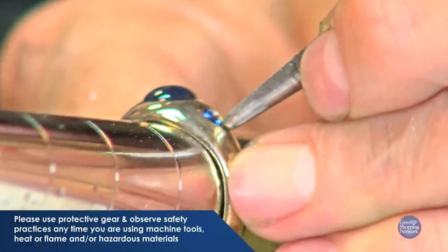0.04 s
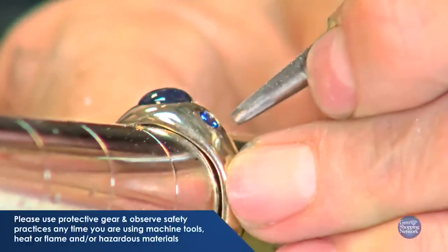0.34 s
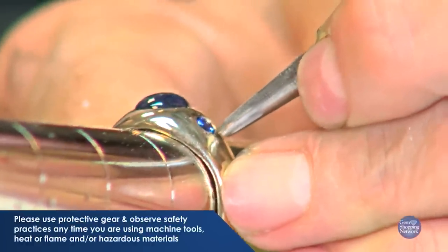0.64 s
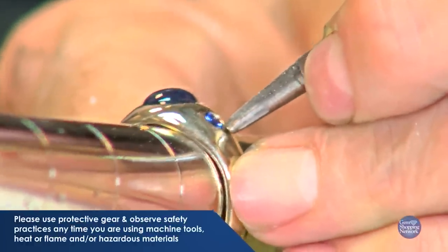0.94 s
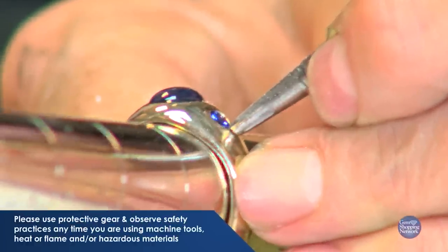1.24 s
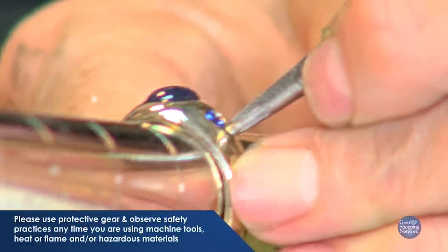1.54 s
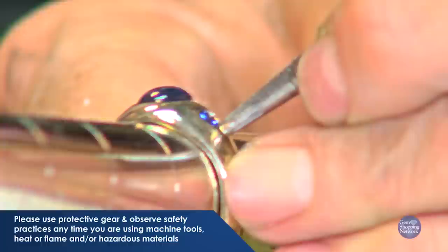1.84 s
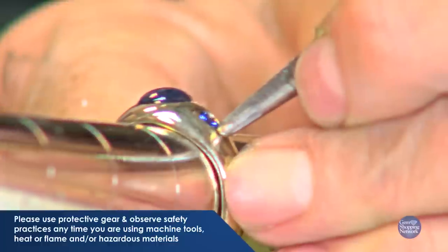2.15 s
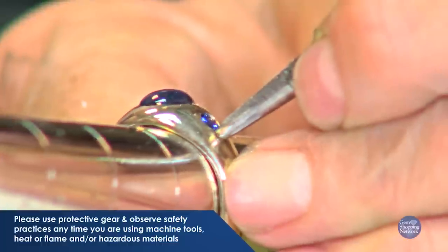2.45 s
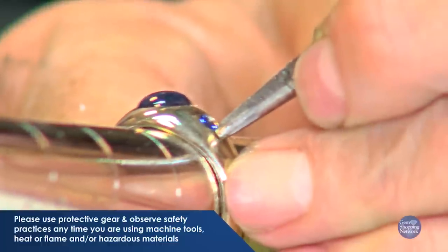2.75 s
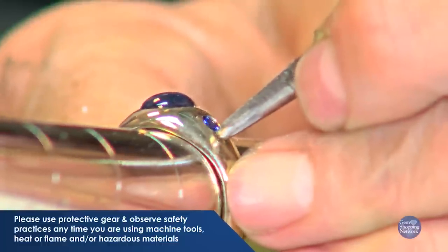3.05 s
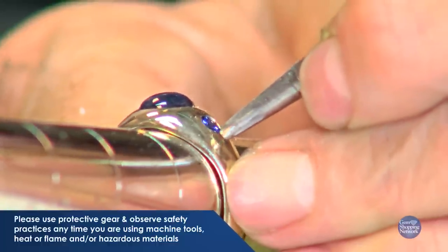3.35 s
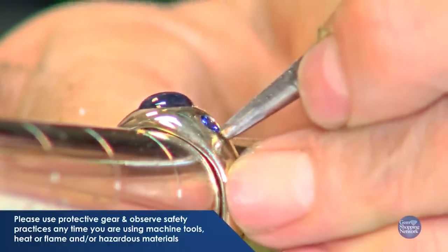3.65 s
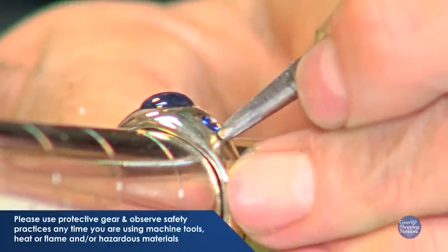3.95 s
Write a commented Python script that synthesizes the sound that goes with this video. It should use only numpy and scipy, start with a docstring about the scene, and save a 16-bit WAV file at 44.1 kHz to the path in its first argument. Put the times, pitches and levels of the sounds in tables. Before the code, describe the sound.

A powered jeweler's hammer tool rapidly strikes a metal ring, with two brief pauses.

```python
"""A motor-driven hammer tool beats a ring on a steel rod, about 28 strokes a second, in a small workshop.
From the start each blow chatters for 3 ms, makes tip and ring sound, and thumps the bench; the tool
rattles in between. At 0.3 s it is lifted and only ticks over a soft hiss. From 0.6 s it hammers again,
its tone following how the tip sits: loose, firm or glancing. It is lifted once more at 3.2 s,
then brushes the ring at 3.5 s and hammers on to the end."""
import sys
import numpy as np
from scipy import signal
from scipy.fft import rfft, irfft
from scipy.io import wavfile

SR = 44100
rng = np.random.default_rng(int(sys.argv[2]) if len(sys.argv) > 2 else 0)


def to_wav(sig):
    """Store sig (one row per channel, or 1-D mono) as 16-bit WAV at the path in sys.argv[1].

    Samples outside -1..1 are clipped; the rate is SR.
    """
    pcm = np.clip(np.atleast_2d(sig), -1, 1) * 32767
    pcm = np.round(pcm).astype(np.int16)
    wavfile.write(sys.argv[1], SR, pcm.T)  # frames by channels


N = 176400
SIZE = 4096  # samples set aside for one short sound
HZ = np.arange(SIZE // 2 + 1) * SR / SIZE  # its frequencies
T = np.arange(SIZE) / SR  # its time in seconds
BLOW_DB = -1.5  # added to both the blows and the rattle

# how hard the tip strikes (time [s], level [dB])
BLOW_STRENGTH = [(0.01, 1.7), (0.19, 0.7), (0.23, 3), (0.77, 1.5), (0.91, 0.1), (0.99, 2), (1.02, 1.4),
                 (1.64, 0.9), (1.71, 0.5), (1.97, 1.9), (2.18, 1.3), (2.44, 1), (2.51, -0.5), (2.93, 1),
                 (3.01, 0), (3.04, 2.7), (3.08, -1.5), (3.11, -0.3), (3.15, -6.5), (3.18, 1.8), (3.61, 2.5),
                 (3.82, 0), (3.85, 0.5), (4.0, 0.5)]


def amp(db):
    """Turn decibels into a factor to multiply by."""
    return 10 ** (np.asarray(db) / 20)


def curve(t, rows, column=1):
    """Read a table at time t, sliding in a straight line from row to row."""
    rows = np.array(rows, float)
    return np.interp(t, rows[:, 0], rows[:, column])


def colour(points, hz=HZ):
    """The gain at each frequency, from points of (frequency [Hz], level [dB])."""
    points = np.array(points, float)
    return amp(np.interp(np.log(hz + 1), np.log(points[:, 0]), points[:, 1]))


def resonate(push, gain):
    """The sound of a pushed object that answers each frequency with this gain."""
    cepstrum = irfft(np.log(gain))
    # fold the late half onto the early half, so the ringing comes after the push
    cepstrum[1:SIZE // 2] *= 2
    cepstrum[SIZE // 2 + 1:] = 0
    return irfft(rfft(push) * np.exp(rfft(cepstrum)))


def add(out, sound, t):
    """Mix a sound in at time t."""
    start = min(max(int(t * SR), 0), N)
    out[start:start + len(sound)] += sound[:N - start]


def chatter(count, length_s, attack_s, likeness):
    """Short bursts of tiny impacts; likeness (0-1) says how much each resembles the one before."""
    shape = np.minimum(T / attack_s, 1) * np.clip(1 - (T / length_s) ** 2, 0, 1)
    shape = np.sqrt(shape / shape.max())
    grain, bursts = rng.standard_normal(SIZE), []
    for fresh in rng.standard_normal((count, SIZE)):
        grain = likeness * grain + np.sqrt(1 - likeness ** 2) * fresh
        burst = grain * shape
        for _ in range(3):  # make all frequencies equally strong, then trim the burst again
            even = irfft(np.exp(1j * np.angle(rfft(burst))))
            burst = even * np.sqrt(shape)
        bursts.append(burst / np.linalg.norm(burst))
    return bursts


def background():
    """The soft, steady noise of motor and workshop."""
    # tone of the noise (frequency [Hz], relative level [dB])
    noise_tone = [(20, 7), (60, 7.5), (130, 5), (300, -15), (900, -4.5), (1600, -17.5), (5000, -21.5),
                  (12000, -26.5), (16000, -16)]
    gain = colour(noise_tone, np.arange(N // 2 + 1) * SR / N)
    noise = irfft(rfft(rng.standard_normal(N)) * gain, N)
    return amp(-49) * noise / noise.std()


def room(sound, delay_s=.007, fade_s=.24):
    """The workshop walls return a short blur of echoes that dies by 60 dB in fade_s."""
    # tone of the echoes (frequency [Hz], level [dB])
    echo_tone = [(40, -19), (250, -14.5), (500, -16), (1000, -2), (1900, -13), (3000, -5.5), (3800, -18.5),
                 (5000, -12.5), (7000, -8), (9000, -14.5), (11500, -8.5), (12500, -15), (14000, -5),
                 (16000, -34)]
    t = np.arange(SR // 2) / SR
    fade = (t > delay_s) * amp(-60 * t / fade_s)
    echoes = fade * rng.standard_normal(len(t)) / np.linalg.norm(fade)
    wall_click = resonate(1. * (T == 0), colour(echo_tone))
    return signal.fftconvolve(sound, signal.fftconvolve(echoes, wall_click))[:N]


def stroke_times(first_s=.0085):
    """The time of every stroke: one for each turn of the motor."""
    # motor speed (time [s], rate [strokes per s])
    motor_speed = [(0.0, 27.018), (0.1, 27.798), (0.7, 27.461), (0.8, 27.72), (0.9, 27.557), (1.6, 27.572),
                   (1.9, 27.451), (2.6, 28.013), (2.7, 28.351), (2.8, 27.754), (2.9, 28.562), (3.1, 27.925),
                   (3.2, 28.664), (3.5, 27.958), (3.6, 28.78), (3.7, 27.889), (3.8, 28.536), (4.0, 27.715)]
    t = np.arange(N) / SR
    turns = np.cumsum(curve(t, motor_speed)) / SR
    turns -= np.interp(first_s, t, turns)
    return np.interp(np.arange(int(turns[-1]) + 1), turns, t)


def plunger_ticks(times, jitter_s=.0006):
    """The plunger inside the tool ticks as it shoots out, stops and slides back, even when lifted."""
    # the three ticks of a stroke (delay [s], level [dB])
    ticks = [(0, -8), (.0036, -7), (.013, -54)]
    # tone of a tick (frequency [Hz], level [dB])
    tick_tone = [(30, -14), (150, -6), (600, 2.5), (1200, -5), (1600, 0), (1820, 5.5), (2150, -2.5),
                 (2900, -5), (3700, -10), (5000, -5.5), (6300, -7.5), (7400, -4.5), (8500, -1), (9700, 2.5),
                 (11200, -3), (12600, 0.5), (16000, -5)]
    out, gain = np.zeros(N), colour(tick_tone)
    for delay, db in ticks:
        jitter = (delay > 0) * jitter_s * rng.standard_normal(len(times))  # the first tick is on time
        bursts = chatter(len(times), length_s=.0036, attack_s=.0006, likeness=.715)
        for t, burst in zip(times + delay + jitter, bursts):
            add(out, amp(db) * resonate(burst, gain), t)
    return out


def rattle(times, delays_s=(.0079, .019, .0275), jitter_s=.001077, scatter_db=2):
    """The tool bounces lightly and unevenly three times after each blow."""
    # strength of the bounces (time [s], relative level [dB])
    bounce_level = [(0, -28), (2.05, -22), (2.3, -19.5), (3.1, -18), (3.2, -26), (3.8, -19.5), (4, -19)]
    # tone of a bounce (frequency [Hz], level [dB])
    bounce_tone = [(100, 1), (450, 20), (750, 22.5), (1400, 5), (2000, 12.5), (2900, -25), (3500, 13),
                   (3900, 16), (4400, 13), (5000, 2), (9000, 4), (16000, -6)]
    out, gain = np.zeros(N), colour(bounce_tone)
    for delay in delays_s:
        bursts = chatter(len(times), length_s=.0083, attack_s=.0015, likeness=.51)
        for t, burst, (later, louder) in zip(times, bursts, rng.standard_normal((len(times), 2))):
            level = amp(BLOW_DB + curve(t, bounce_level) + scatter_db * louder)
            add(out, level * resonate(burst, gain), t + delay + jitter_s * later)
    return out


def swing(start_s, length_s, skew=1):
    """One smooth move out and back; a skew under 1 starts fast and settles slowly."""
    return np.sin(np.pi * np.clip((T - start_s) / length_s, 0, 1) ** skew)


def bench_thumps(times, bass_cut_hz=14):
    """Each blow pushes the rod into the bench, which springs back, sinks again and rings dully."""
    # strength of the thump (time [s], relative level [dB])
    thump_level = [(0.01, -3.1), (0.05, -7.7), (0.15, 3.3), (0.19, -8.8), (0.26, 0.4), (0.66, 4.2),
                   (0.7, -3.0), (0.81, -4.4), (0.84, 4.5), (0.91, 5.6), (1.1, -12.4), (1.13, -0.4),
                   (1.6, -0.8), (1.71, -3.0), (1.93, 2.8), (2.08, -1.0), (2.11, 1.8), (2.47, 1.3),
                   (2.54, -1.5), (3.04, 2.9), (3.15, -5.2), (3.54, 2.8), (3.61, -3.4), (3.64, 3.1),
                   (3.75, -10.2), (3.82, -8.6), (3.85, 2.1), (4.0, 2.1)]
    # low notes of the wood (frequency [Hz], time to fade by 60 dB [s], relative level [dB])
    wood_notes = [(160, .2, -55), (305, .3, -46.5)]
    out = np.zeros(N)
    for t, stretch in zip(times, np.exp(.08 * rng.standard_normal(len(times)))):
        wood = sum(amp(db - 60 * T / fade_s) * np.sin(2 * np.pi * (hz * T + rng.random()))
                   for hz, fade_s, db in wood_notes)
        push_s, recoil_s = .0013 * stretch, .0035 * stretch
        push = amp(-24) * swing(0, push_s)
        recoil = amp(-22.5) * swing(push_s, recoil_s, skew=.56)
        sag = amp(-41) * swing(push_s + recoil_s, length_s=.0089)
        thump = amp(curve(t, thump_level)) * (recoil - push - sag)
        add(out, thump + amp(curve(t, BLOW_STRENGTH)) * wood, t)
    return signal.sosfilt(signal.butter(2, bass_cut_hz, "high", fs=SR, output="sos"), out)


def metal_tone(t, click_db=-15, scatter_db=2, pitch_scatter=.008):
    """How the metal answers each frequency as the tip sits at time t; no two blows are quite alike."""
    # how the tip sits (time [s], firm share [0-1], glancing share [0-1]); the rest is loose
    tip_seating = [(0, 0.8, 0.15), (.08, 0, 0.56), (.12, 0.8, 0.1), (.16, 0.7, 0.2), (.19, 0.54, 0.48),
                   (.26, 0, 0.08), (.66, 0, 0.4), (.8, 0, 0.02), (.87, 0.3, 0.03), (.99, 0.13, 0.07),
                   (1.04, 0.35, 0.42), (1.1, 0.2, 0.8), (1.13, 1, 0.03), (3.13, 0.98, 0), (3.19, 0, 0.27),
                   (3.6, 0.06, 0.06), (3.68, 0.57, 0), (3.75, 0.35, 0.53), (3.82, 0.34, 0.6),
                   (3.86, 0.96, 0), (4, 0.95, 0.02)]
    # notes of tip, ring and rod (frequency [Hz], width [Hz], loose [dB], firm [dB], glancing [dB])
    metal_notes = [(682, 140, 4, 2.5, 12), (1031, 58, 20, 9, -1), (1230, 670, 8, 2, 9.5),
                   (1950, 150, 8, 6.5, 10.5), (2388, 290, 7.5, 3.5, -2), (3173, 293, 11, -1, -6),
                   (3768, 177, 20.5, 20, -4), (4027, 426, 15.5, 12, 5), (5650, 300, 7.5, -8, -17),
                   (6670, 840, -3.5, -2, 6.5), (7950, 400, 5, 6.5, 15.5), (9390, 320, 4, 3, 14),
                   (10220, 350, -4, 4.5, 10), (11360, 330, -14, 9, 9), (12200, 490, -14, 9.5, 4.5),
                   (13300, 280, -16, 5.5, -3), (14700, 1400, -22, -2, -24)]
    firm, glancing = curve(t, tip_seating), curve(t, tip_seating, column=2)
    shares = np.array([max(1 - firm - glancing, 0), firm, glancing])
    power = amp(click_db) ** 2  # a broad click lies under the notes
    for hz, width, *levels_db in metal_notes:
        louder, higher = rng.standard_normal(2)
        peak = shares @ amp(np.array(levels_db) + scatter_db * louder) ** 2
        distance = (HZ - hz * (1 + pitch_scatter * higher)) / width
        power = power + peak / (1 + 2 * distance ** 2) ** 2
    return np.sqrt(power)


def hammer_blows(times, scatter_db=.38):
    """At each blow the tip chatters on the ring and sets the metal ringing."""
    # one light brush of the tip as it comes back to the ring (time [s], level [dB])
    brush = (3.504, -6.5)
    out = np.zeros(N)
    levels = curve(times, BLOW_STRENGTH) - scatter_db * rng.standard_normal(len(times))
    hits = list(zip(times, levels)) + [brush]
    bursts = chatter(len(hits), length_s=.00322, attack_s=.0003, likeness=.85)
    for (t, db), burst in zip(hits, bursts):
        add(out, amp(BLOW_DB + db) * resonate(burst, metal_tone(t)), t)
    return out


def scene():
    """The tool runs the whole time and hammers while it is pressed on the ring."""
    # when the tip is on the metal (start [s], end [s])
    presses = [(-.1, .28), (.643, 3.2), (3.52, 4.1)]
    strokes = stroke_times()
    hits = np.array([t for t in strokes if any(start < t < end for start, end in presses)])
    hammering = hammer_blows(hits) + rattle(hits) + bench_thumps(hits)
    ticks = plunger_ticks(strokes)
    echoes = room(hammering + amp(1) * ticks)  # the tool's body is farther off, so its ticks echo more
    return (hammering + ticks + echoes + background())[None]


def record(dry, top_hz=15800):
    """Cut away the very highest treble."""
    return signal.sosfilt(signal.ellip(8, .2, 70, top_hz, fs=SR, output="sos"), dry)


dry = scene()
out = record(dry)
to_wav(out)
```